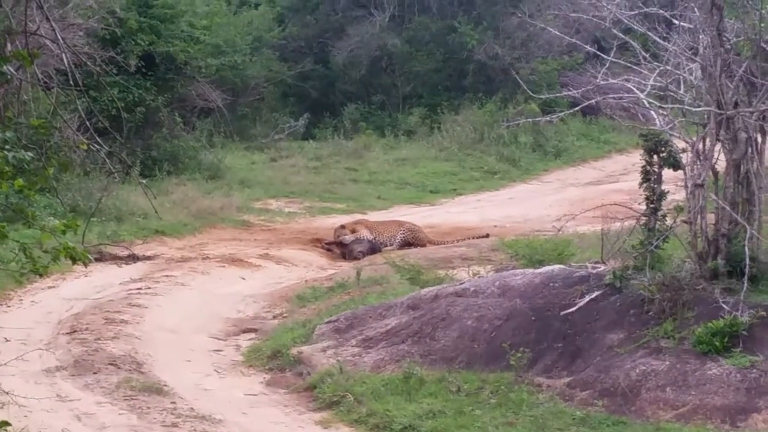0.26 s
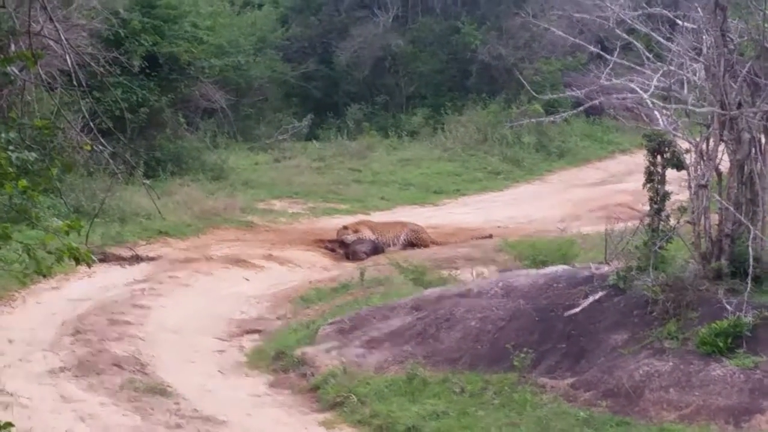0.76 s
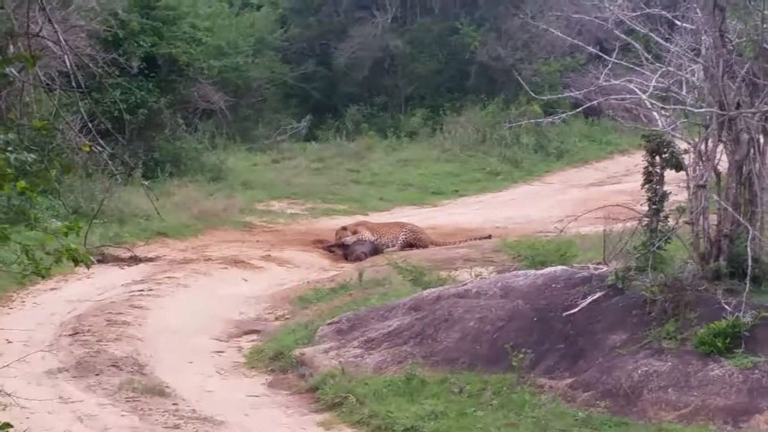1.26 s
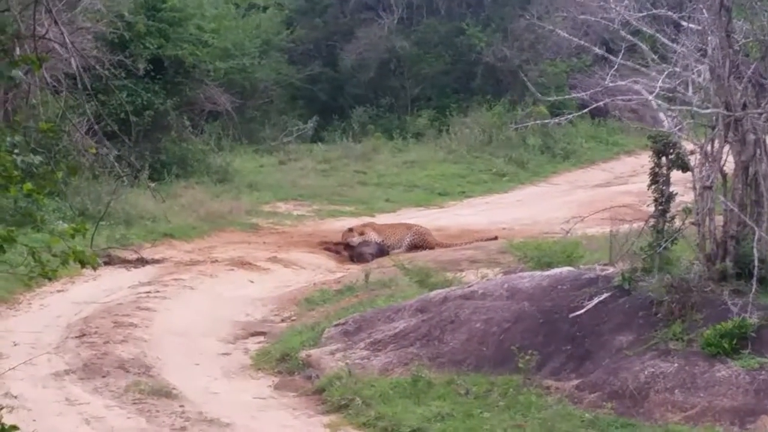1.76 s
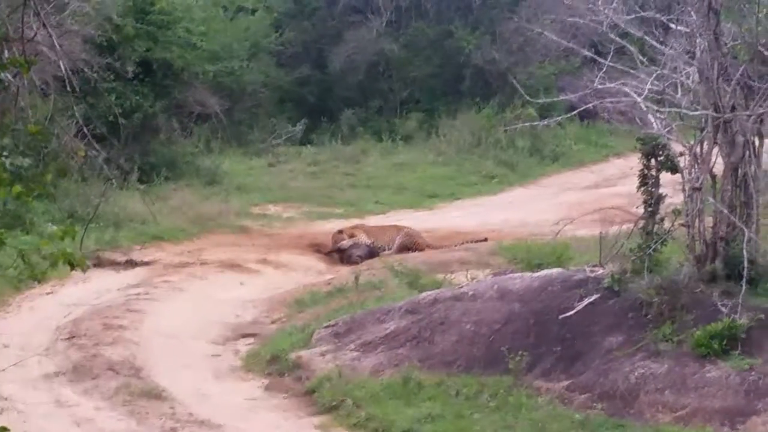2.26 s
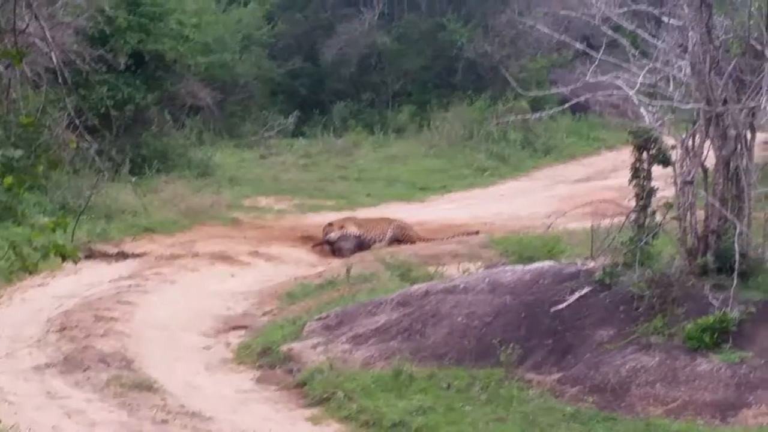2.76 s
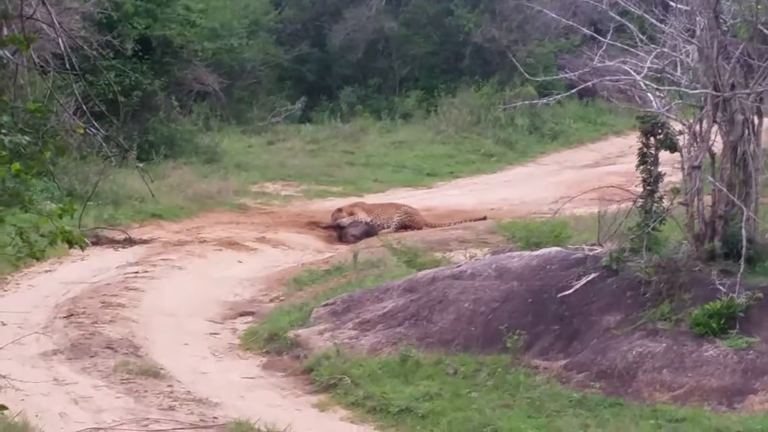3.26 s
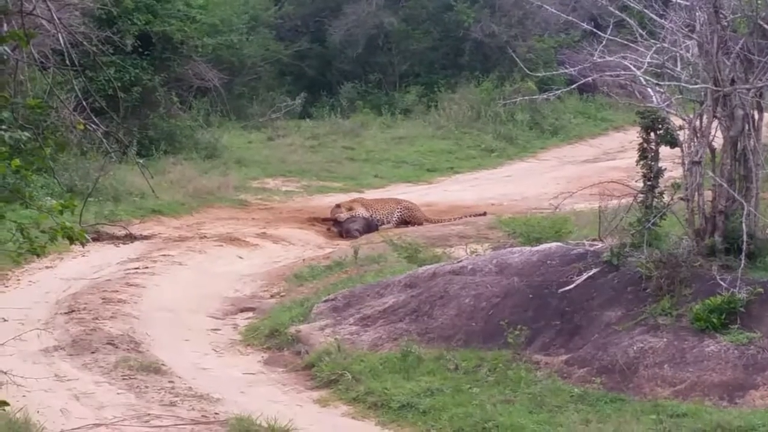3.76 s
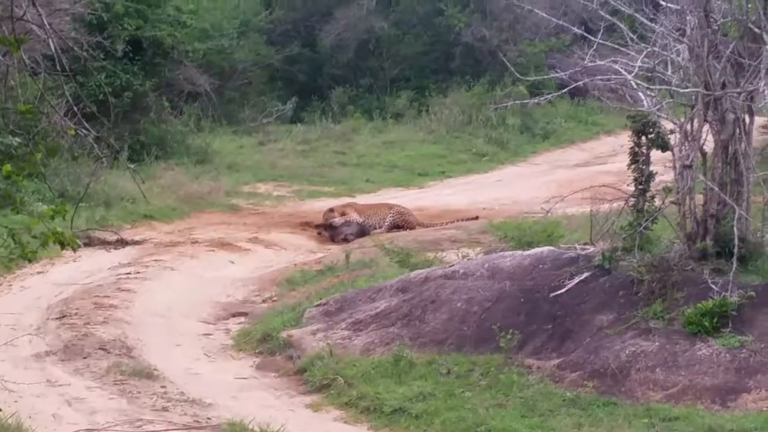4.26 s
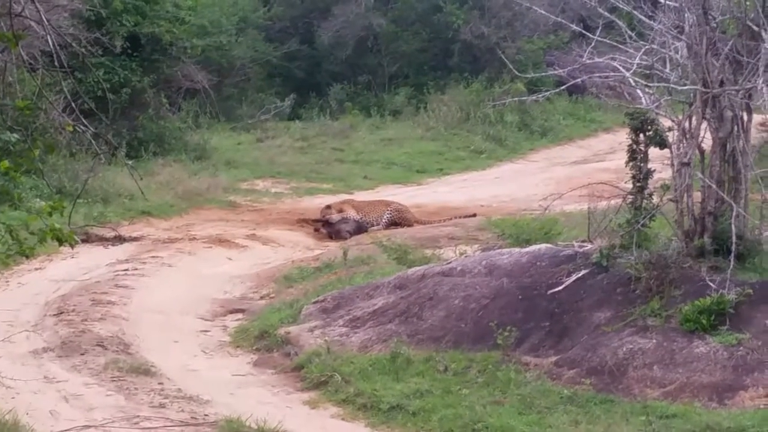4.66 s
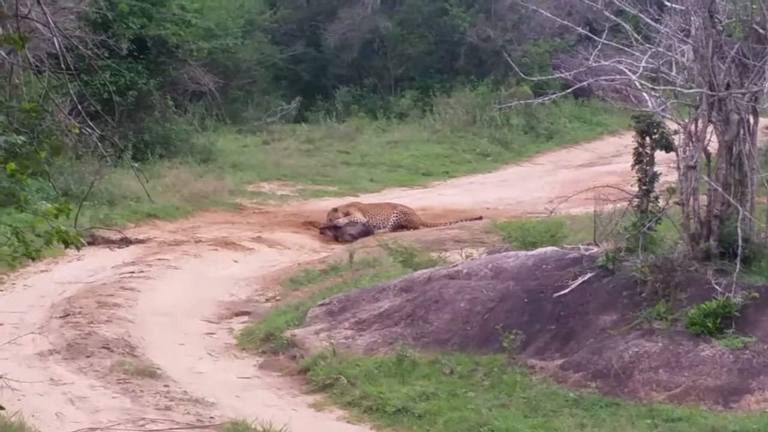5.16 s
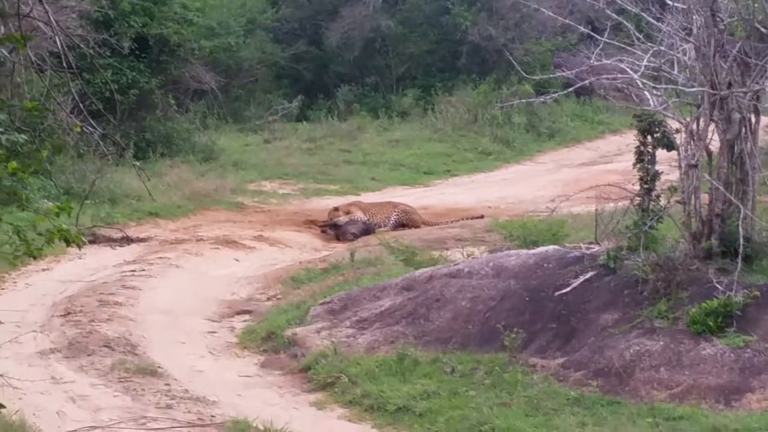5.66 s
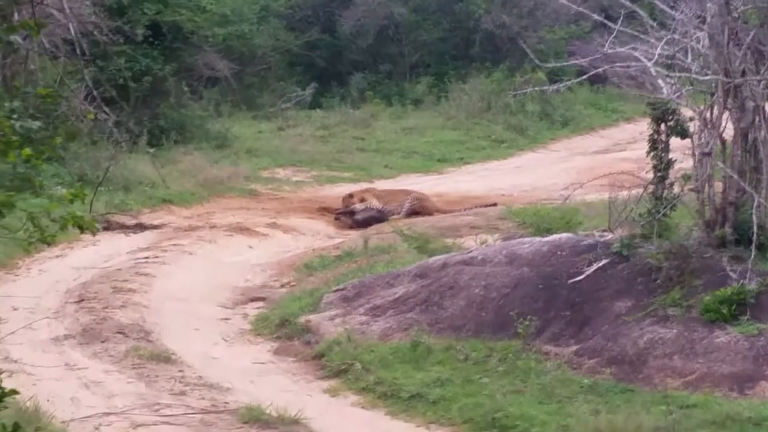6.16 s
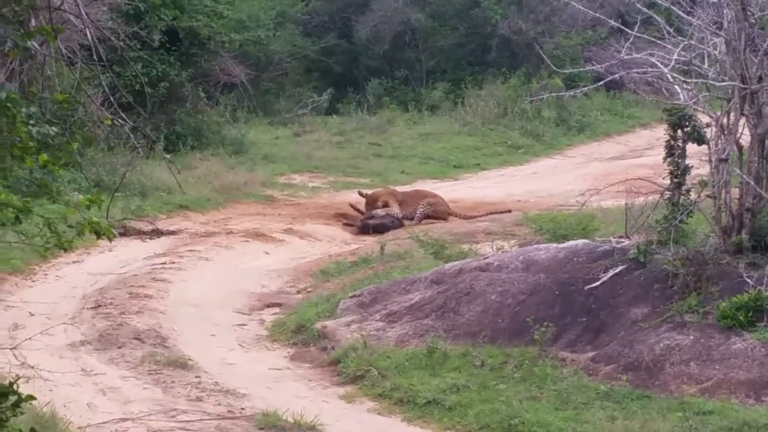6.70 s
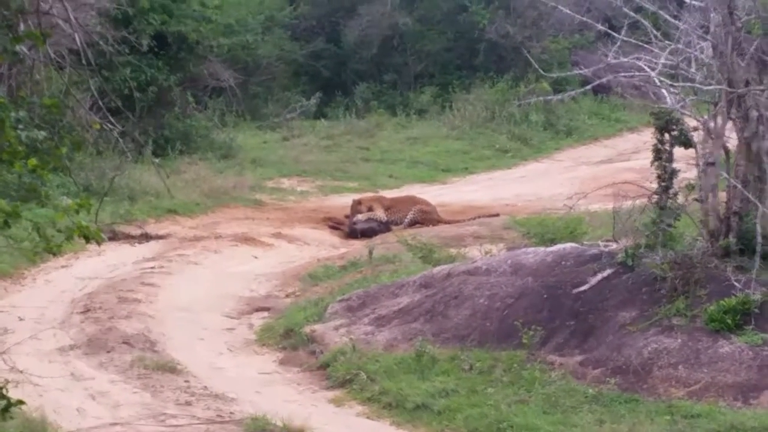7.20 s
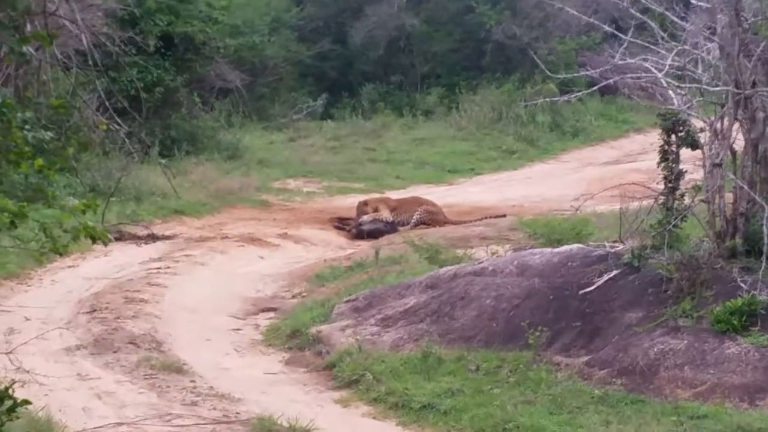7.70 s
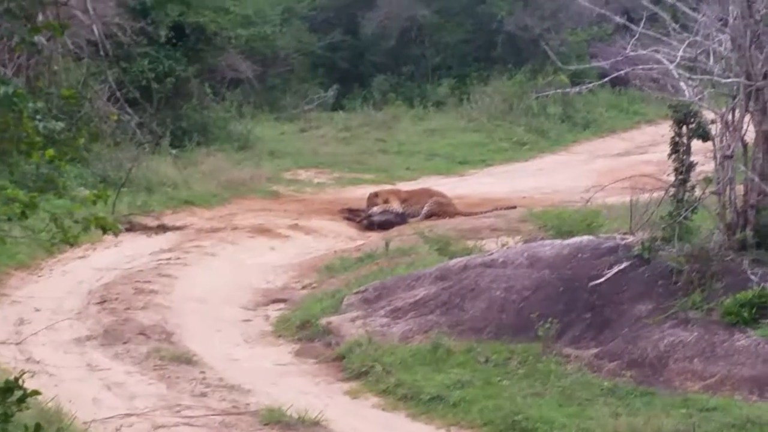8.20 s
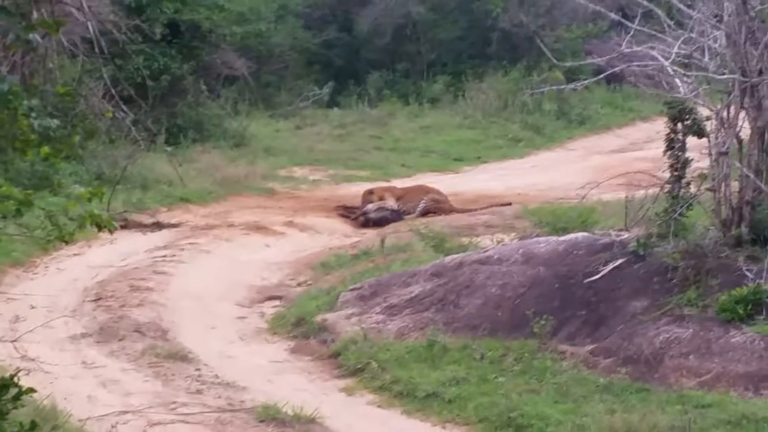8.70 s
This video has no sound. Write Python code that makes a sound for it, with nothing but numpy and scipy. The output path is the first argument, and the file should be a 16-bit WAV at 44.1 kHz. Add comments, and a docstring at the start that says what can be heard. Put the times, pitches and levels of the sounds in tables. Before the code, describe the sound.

Open bushland with a shimmering high insect chorus, smooth drone and low gusty rumble on the microphone. A cricket deep in the bush trills around four to five seconds. Then a boar some distance away groans and grunts weakly, barks, rasps upward and lets out a single harsh, fluttering squeal just over a second long, ending in hoarse gasps. A nearer cricket chirps sharply over the end.

```python
"""Boar squeal in the bush

A wild boar, pinned by a leopard on a dirt track some way off, grunts, rasps and breaks into one long squeal.
Its folds sing near 480 Hz while a slower flap in the throat chops the tone about 95 times a second;
hoarse calls are uneven clicks and noise through mouth filters. Crickets chirp in falling sweeps, near and far.
Filtered noise makes the rumble, wash, hiss, drone, twig ticks and scuffling; diffuse tails answer from the bush."""
import sys
import numpy as np
from scipy import signal
from scipy.fft import rfft, irfft
from scipy.io import wavfile
from scipy.ndimage import uniform_filter1d

SR = 44100
rng = np.random.default_rng(int(sys.argv[2]) if len(sys.argv) > 2 else 0)


def int16_out(signal):
    """Quantize to a 16-bit WAV file."""
    q = np.round(np.clip(np.atleast_2d(signal).T, -1, 1) * 32767)
    wavfile.write(sys.argv[1], SR, q.astype(np.int16))


N = 394254
TIME = np.arange(N) / SR  # s
FREQ = np.maximum(np.arange(N // 2 + 1) * SR / N, 1)  # Hz

# gusty rumble of the breeze: [t/s, level/dB]
BREEZE = [(0, -61), (1.6, -62), (2.4, -58), (3.5, -60), (5.7, -60), (8.1, -55), (8.94, -55)]
# colour of that rumble: [f/Hz, level/dB]
RUMBLE = [(16, -33), (28, -0.5), (65, 1.5), (139, -4.5), (237, -12.5), (400, -25), (520, -50), (880, -120)]
# air buffeting the microphone, the last two rows dull thumps of the struggle: [t/s, peak level/dB, f/Hz]
BUFFETS = [(0.278, -48, 79), (1.328, -49, 136), (2.204, -45, 72), (2.339, -44.5, 80.7), (2.769, -42.5, 53),
           (3.058, -41, 77.4), (3.9, -46, 177), (4.095, -36.5, 130), (6.06, -45, 100), (8.029, -34.5, 220)]
# colour of the forest's distant wash: [f/Hz, level/dB]
WASH = [(250, 3.5), (450, -3.5), (700, -9.5), (1000, -10.5), (1400, -17.5), (2200, -20), (3200, -27)]
# the wash over time: [t/s, level/dB]
WASH_LEVEL = [(0, -75.5), (3.3, -72), (5.3, -69.5), (8.94, -66.5)]
# colour of the thin top hiss: [f/Hz, level/dB]
HISS = [(8500, -15.5), (10000, -14.5), (11000, -3), (15500, 0.5)]
# the hiss over time, before an 8 dB lift: [t/s, level/dB]
HISS_LEVEL = [(0.0, -89), (1.04, -91), (1.87, -82.5), (4.01, -89.5), (4.56, -82.5), (6.6, -88.5),
              (6.8, -82), (8.22, -74.5), (8.66, -86.5), (8.94, -76)]
# faint, airy calls gliding far away: [start t/s, length/s, from f/Hz, to f/Hz, level/dB]
FAR_CALLS = [(1.331, 0.25, 461, 585, -71), (2.49, 0.65, 2750, 1865, -77.5), (3.433, 0.46, 464, 647, -71)]
# smooth insect drone, right side 9 dB lower: [t/s, left level/dB]
DRONE = [(0, -74), (3.5, -72), (4.7, -70), (8.94, -69.5)]
# high far chorus: [t/s, level/dB]
CHORUS = [(0, -55), (1, -57.5), (1.6, -55.5), (4.7, -54), (6.5, -55), (6.8, -52), (8.2, -49), (8.6, -53.5)]
# outline filter on the high far chorus, strongest from 6 to 8 kHz: [f/Hz, level/dB]
CHORUS_OUTLINE = [(5300, -20.5), (5750, -8), (6050, 0), (6900, -1.5), (7650, 5), (8050, -7), (8500, -22.5),
                  (15500, -15)]
# lower-pitched far crickets: [t/s, level/dB]
LOW_CHORUS = [(1.0, -90), (1.8, -76), (2.2, -65.5), (5.3, -67.5), (6.1, -85), (6.8, -81), (7.5, -60.5),
              (8.5, -64.5)]
# bout of a cricket deep in the bush:
# [start t/s, lone strokes, their spacing/s, first chirp t/s, chirps, chirp period/s, full level/dB]
BUSH_CRICKET = [(4.0575, 8, .0376, 4.382, 12, .0769, -35.5)]
# colour of the bush cricket's direct chirps, two-peaked near 4.6 and 5.5 kHz: [f/Hz, level/dB]
BUSH_DIRECT_COLOUR = [(4000, -6), (4550, 9.5), (4820, 7), (5050, -3), (5300, -18), (5520, 8.5),
                      (5800, -3.5), (9700, -31), (10800, 11.5), (11600, -4), (15500, 0)]
# colour of the bush cricket's diffuse echo: [f/Hz, level/dB]
BUSH_ECHO_COLOUR = [(4000, 1), (4750, -4), (5050, 0.5), (5450, 0), (5800, -13), (9700, -36), (10800, 7.5),
                    (11600, -5), (15500, 4)]
# bouts of the near cricket:
# [start t/s, lone strokes, their spacing/s, first chirp t/s, chirps, first chirp period/s, full level/dB]
NEAR_CRICKET = [(2.7785, 2, .056, 2.903, 1, .085, -38), (7.1817, 2, .054, 7.2986, 2, .091, -31),
                (7.8385, 1, .054, 7.8722, 5, .0794, -26), (8.689, 0, .054, 8.691, 4, 0.0737, -26)]
# colour of the near cricket: [f/Hz, level/dB]
NEAR_TONE = [(3500, -2.5), (6000, -0.5), (9200, -2), (10100, 2), (11500, 5), (17000, 1.5)]
# dry twigs ticking: [t/s, noise burst level before the resonance/dB]
TICKS = [(2.4857, -55), (5.284, -51.5), (5.871, -47)]
# bodies scuffling on the dirt: [t/s, level/dB]
SCUFFLE = [(4.2, -75), (5.2, -65), (6.3, -73), (6.6, -63), (7.6, -60), (8.3, -62), (8.7, -76)]
# faint huffs of the struggle: [t/s, time from peak to 1/e/s, centre f/Hz, level/dB]
HUFFS = [(0.155, 0.068, 744, -81), (3.728, 0.041, 780, -74), (4.635, 0.047, 650, -67.5)]
# mouth colour of each kind of hoarse call: [f/Hz, level/dB]
GROAN_MOUTH = [(150, -43), (250, -11), (335, -29), (400, -6.5), (590, -1), (665, -11.5), (770, 2),
               (860, -10.5), (1210, -13.5), (1700, -27.5), (2800, -49), (3640, -76), (6160, -120)]
GRUNT_MOUTH = [(88, -16), (150, -4), (235, -2), (290, 7.5), (388, -15.5), (492, -18), (580, -11),
               (696, -22), (1600, -46), (2080, -67), (3520, -120)]
BARK_MOUTH = [(130, -46), (220, -30), (301, -20), (381, 0), (469, -10), (542, 2.5), (651, -12.5),
              (845, 3.5), (951, -37), (1140, -0.5), (1410, -15), (1670, -1.5), (2310, -26.5), (2530, -42),
              (4200, -35), (5000, -43), (6500, -64), (11000, -120)]
RASP_MOUTH = [(160, -62), (280, -19.5), (328, -31), (440, -11.5), (550, -6.5), (667, -16), (780, -8),
              (958, -15.5), (1110, -15.5), (1330, -25), (1460, -28), (1670, -20), (2070, -22.5),
              (2450, -40), (3500, -43.5), (4380, -36.5), (5000, -44), (6500, -88), (11000, -120)]
GASP_MOUTH = [(59, -42), (100, -14.5), (147, 2), (259, -17), (415, -2), (601, -4.5), (664, -15),
              (787, -6.5), (1280, -25.5), (3000, -31), (3900, -24.5), (6600, -120)]
# hoarse calls: [start t/s, attack/s, hold/s, release/s, level/dB, slap rate f/Hz, share of noise
# (over 1 the clicks invert), treble dB per dB of effort, glide per s, mouth colour]
HOARSE_CALLS = [(5.43, 0.094, 0.12, 0.075, -51, 84.5, 0.75, -0.5, 0.1, GROAN_MOUTH),
                (5.777, 0.064, 0.13, 0.15, -49.5, 54.95, 1.23, -4, 0.038, GRUNT_MOUTH),
                (5.829, 0.035, 0.027, 0.06, -61, 70, 0.53, 5, 0, GROAN_MOUTH),
                (6.134, 0.053, 0.012, 0.046, -60, 55, 0.8, -0.3, 0.097, GRUNT_MOUTH),
                (6.554, 0.039, 0.052, 0.037, -47.5, 111, 0.56, 11, 0.77, GROAN_MOUTH),
                (6.584, 0.046, 0.08, 0.11, -36.5, 129.3, 0.74, -1.1, 0.27, BARK_MOUTH),
                (6.778, .175, .11, 0.054, -37, 169.7, 0.83, -0.5, .8, RASP_MOUTH),
                (8.202, 0.03, 0.074, 0.06, -45.5, 89.6, 1.4, 0, 0.0081, GASP_MOUTH),
                (8.307, 0.034, 0.14, 0.12, -52.5, 89, 0.84, 0, 0.018, GASP_MOUTH)]
# thin whine carrying the bark over into the squeal: [t/s, f/Hz, level/dB]
WHINE = [(6.72, 1575, -67), (6.77, 1590, -49), (6.81, 1644, -60), (6.87, 1637, -50), (6.95, 1734, -48.5),
         (7.0, 1512, -47.5), (7.1, 1481, -37), (7.2, 1457, -41.5)]
# lower wail that climbs into the squeal: [t/s, f/Hz, level/dB]
WAIL = [(6.88, 685.7, -61), (6.95, 747, -33), (7.0, 819, -32), (7.06, 934, -60)]
# push and mouth of the squeal: [t/s, effort level/dB, opening as upper resonances over the lowest/dB]
SQUEAL = [(7.05, -43.5, 4), (7.1, -40, 2.5), (7.16, -38, 2), (7.24, -42, 8), (7.504, -36.5, 5.5),
          (7.72, -36, 5.5), (7.86, -32.5, -1), (8.03, -27, -8), (8.126, -28, -8), (8.19, -33.5, -11),
          (8.225, -50, 4.5)]
# pitch of the squeal: [t/s, f/Hz]
PITCH = [(7.05, 520.5), (7.1, 493.3), (7.17, 488), (7.3, 475.4), (7.48, 484.6), (7.58, 504.4),
         (7.67, 480.2), (7.74, 492.7), (7.81, 475.2), (7.86, 484.8), (7.94, 461.8), (8.08, 459.2),
         (8.15, 472.4), (8.22, 486)]
# slow flap in the throat: [t/s, rate f/Hz, chop of the lowest resonance,
# chop of the second (over 1 splits the line), pitch swing share, unsteadiness]
FLAP = [(7.05, 78, 0.3, 0.33, 0.093, 1.773), (7.17, 84.7, 0.27, 0.95, 0.15, 1.57),
        (7.32, 93, 0.83, 0.5, 0.14, 1.27), (7.48, 96.76, 1, 0.96, 0.16, 1.04),
        (7.61, 93.16, 0.5, 0.64, 0.16, 1.47), (7.74, 96.54, 0.85, 0.86, 0.19, 1.03),
        (7.86, 96.7, 0.22, 2.3, 0.15, 0.74), (7.93, 95.8, 0.16, 2.2, 0.17, 1.12),
        (8.05, 94.5, 0.045, 1.8, 0.21, 1.32), (8.2, 96.7, 0.085, 1.8, 0.1, 3.1)]
# throat resonances, levels counting only inside a shared band: [f/Hz, width/Hz, level/dB]
THROAT = [(442, 200, 0), (988, 303, 0), (1577, 247, -5), (1904, 130, -7), (2264, 110, -15.5),
          (2574, 160, -21.5), (2903, 170, -19)]
# five throat bands, low to top: [level over the effort/dB, share of the opening]
THROAT_PARTS = [(0, 0.15), (-0.5, 0.9), (-4, 0.78), (-10, 0.94), (-23, -0.083)]
# ring near 2 kHz against the rest of the squeal: [t/s, level/dB]
RING = [(7.05, 2), (7.18, -4), (7.34, -7), (7.4, 1), (7.53, -7), (7.65, -1.5), (7.74, -2.5), (7.9, 4),
        (8.2, 1.5)]
# thin resonances high above the squeal: [f/Hz, width/Hz]
TOP_RESONANCES = [(3990, 220), (4400, 190), (4850, 300)]
# how strongly each of those three rings: [t/s, level/dB, level/dB, level/dB]
TOP_LEVELS = [(7.05, -63, -63, -66.5), (7.28, -64, -54.5, -59), (7.42, -64, -55, -66),
              (7.56, -61.5, -61, -66), (7.74, -57.5, -59, -61), (8.0, -63, -62.5, -61),
              (8.12, -71.5, -63, -78)]
# stereo lean of the cries: [f/Hz, left minus right level/dB]
LEAN = [(200, -4), (480, 1.5), (700, 4.5), (1000, 12), (1600, 4), (2800, 9.5), (4200, 5)]


def undb(db):
    """Decibels to gain."""
    return 10 ** (np.asarray(db) / 20)


def unit(x):
    """Scale to rms 1."""
    return x / np.sqrt(np.mean(x ** 2))


def curves(table):
    """The columns of a table, joined by straight lines in time."""
    s, *columns = np.transpose(table)
    return [np.interp(TIME, s, c) for c in columns]


def during(table, fade):
    """1 while the table lasts, with soft ends `fade` seconds long."""
    inside = np.minimum(TIME - table[0][0], table[-1][0] - TIME)
    return np.clip(inside / fade, 0, 1)


def shape(points):
    """A (Hz, dB) outline on every frequency, joined along log frequency."""
    hz, db = np.transpose(points)
    return np.interp(np.log(FREQ), np.log(hz), db)


def colour(x, points):
    """Filter by an outline that falls steeply beyond its ends."""
    low_skirt = 1 / (1 + (points[0][0] / FREQ) ** 8)
    high_skirt = 1 / (1 + (FREQ / points[-1][0]) ** 8)
    return irfft(rfft(x) * undb(shape(points)) * np.sqrt(low_skirt * high_skirt), N)


def resonate(x, modes):
    """Parallel (Hz, width, dB) resonances, each applied twice for deep valleys."""
    response = 0
    for hz, width, db in modes:
        response = response + undb(db) / (1 + 1j * (FREQ ** 2 - hz ** 2) / (FREQ * width)) ** 2
    return irfft(rfft(x) * response, N)


def walk(rate):
    """Smooth chance with spread near 1, drawing `rate` new values a second."""
    return 1.2 * np.interp(TIME * rate, np.arange(N // 8), rng.standard_normal(N // 8))


def cycles(hz):
    """Running phase of an oscillator, in radians."""
    return 2 * np.pi * np.cumsum(hz) / SR


def steady(x):
    """Even out slow changes of level."""
    return x / np.sqrt(uniform_filter1d(x ** 2, size=2800) + 1e-12)


def add(track, s, sound):
    """Mix a sound in, centred on a time."""
    i = int(s * SR) - len(sound) // 2
    a, b = max(i, 0), min(i + len(sound), N)
    if b > a:
        track[a:b] += sound[a - i:b - i]


def scatter(x, t60, wet_db, delay=0.01):
    """Direct sound plus a diffuse tail from leaves and trunks, different on each side."""
    t = TIME[:SR]
    tail = rng.standard_normal((2, SR)) * undb(-60 * t / t60) * (t > delay)
    tail /= np.sqrt(np.sum(tail ** 2, axis=1, keepdims=True))
    wet = signal.fftconvolve(np.atleast_2d(x), tail, axes=1)[:, :N]
    return (x + undb(wet_db) * wet) / np.hypot(1, undb(wet_db))


def ports(x, lag):
    """A sound from the side reaches the left port `lag` seconds after the right."""
    return np.array([np.roll(x, int(lag * SR)), x])


def air():
    """Gusty rumble with single soft buffets and thumps, the forest's wash, and a thin hiss on top."""
    eddies = colour(rng.standard_normal((2, N)), [(15, 7.0), (60, 5.5), (130, 5.5), (300, 4.0), (900, -9.0)])
    # shared gusts plus eddies that differ at each port
    wind = unit(colour(rng.standard_normal(N) + eddies, RUMBLE))
    wind *= undb(curves(BREEZE)[0] + 2.0 * walk(18))
    bumps, t = np.zeros(N), np.arange(-SR // 20, SR // 20) / SR
    for s, db, hz in BUFFETS:
        add(bumps, s, undb(db) * np.sin(2 * np.pi * hz * t) * np.exp(-(t * hz / 0.36) ** 2))
    wash_noise = rng.standard_normal(N) + 4.8 * rng.standard_normal((2, N))
    wash = unit(colour(wash_noise, WASH)) * undb(curves(WASH_LEVEL)[0] + walk(4.5))
    hiss = unit(colour(rng.standard_normal((2, N)), HISS)) * undb(curves(HISS_LEVEL)[0] + 8.0)
    return (wind + bumps + wash + hiss) * undb([[-1], [1]])  # the right side is lifted by 2 dB


def far_call(start, length, from_hz, to_hz, db):
    """A faint, airy call: a wavering sine slides in pitch and fades into a long diffuse tail."""
    part = np.clip((TIME - start) / length, 0, 1)
    hz = from_hz + (to_hz - from_hz) * part
    tone = np.sin(cycles(hz * (1 + 0.033 * walk(500))))
    envelope = np.minimum(part * 10, 1) * (1 - part)
    return scatter(tone * undb(db) * envelope, t60=0.59, wet_db=6)


def stroke(hz, fall, width, second_db=-21, third_db=-31, bite=0):
    """One wing stroke: the scraper slows along the file, so the tone falls; it is loudest midway."""
    t = np.arange(-SR // 50, SR // 50) / SR
    phase = cycles(hz * (1 - fall * np.tanh(t / (2 * width))))
    hard_middle = np.exp(-(t / 0.0038) ** 4)  # the scraper's bite; 3.8 ms from centre to 1/e
    swell = (np.exp(-np.abs(t / width)) + bite * hard_middle) / (1 + bite)
    tone = np.sin(phase) + undb(second_db) * np.sin(2 * phase)
    tone += undb(third_db) * np.sin(3 * phase) * (3 * hz < SR * .4)  # left out near the band limit
    return tone * swell * signal.windows.tukey(len(t))


def chorus(hz, fall, width, rate, gap, step_db, wet_db, spread, count):
    """Far crickets, each `step_db` above the last, chirp pairs of strokes at their own pitch and pace."""
    out = np.zeros((2, N))
    for k, (pace, start, side) in enumerate(rng.uniform(-1, 1, (count, 3))):
        song = np.zeros(N)
        sound = stroke(hz * (1 + spread * np.sin(2 * k)), fall, width, -63.5, -82.0)
        for n, (late, first_chance, second_chance) in enumerate(rng.standard_normal(size=(130, 3))):
            s = (n + start - 1) / (rate * (1 + .04 * pace)) + .003 * late
            add(song, s, undb(2 * first_chance) * sound)
            add(song, s + gap, undb(2 * second_chance) * sound)
        out += undb(k * step_db) * ports(song, side * .0004)
    return unit(scatter(out, t60=1.0, wet_db=wet_db))


def bout(row, pair_gap, slowing, swell_db, swell_s, first_db):
    """Stroke times and levels: lone strokes lead in, then paired chirps swell, each gap `slowing` s longer."""
    start, lone, spacing, first_chirp, chirps, period, full_db = row
    strokes = [(start + k * spacing, first_db) for k in range(round(lone))]
    for k in range(round(chirps)):
        s = first_chirp + k * period + slowing * k * (k - 1) / 2
        strokes += [(s, first_db), (s + pair_gap, 0)]
    return [(s, full_db + db - swell_db * np.exp((start - s) / swell_s)) for s, db in strokes]


def cricket(bouts, hz, fall, width, second_db, third_db, uneven_db, pitch_rise, bite):
    """A single cricket: strokes vary in level, and those planned louder sound a little higher."""
    strokes = sum(bouts, [])
    out, top_db = np.zeros(N), max(db for _, db in strokes)
    for (s, db), chance in zip(strokes, rng.standard_normal(len(strokes))):
        speed = undb(db - top_db) ** pitch_rise
        sound = stroke(hz * speed, fall, width, second_db, third_db, bite)
        add(out, s, undb(db + uneven_db * chance) * sound)
    return out


def insect_drone():
    """A smooth band of noise, stronger on the left, swelling a little."""
    band = [(2900, -15.5), (3350, 3), (3800, 2), (4400, -2.0), (5100, -10.5), (6000, -19.5)]
    drone = unit(colour(rng.standard_normal((2, N)), band))
    return drone * undb(curves(DRONE)[0] + np.array([[0], [-9]]) + 0.3 * walk(9.4))


def far_choruses():
    """Two far groups of crickets, high and low, blurred by long diffuse tails."""
    high = chorus(hz=6804, fall=0.17, width=0.0042, rate=11.6, gap=.024,
                  step_db=0.5, wet_db=-2.5, spread=0.055, count=7)
    low = chorus(hz=5380, fall=0.13, width=0.0033, rate=13.0, gap=0.029,
                 step_db=1, wet_db=-1, spread=0.035, count=4)
    high = unit(colour(high, CHORUS_OUTLINE)) * undb(curves(CHORUS)[0])
    return high + low * undb(curves(LOW_CHORUS)[0])


def bush_cricket():
    """Falling strokes heard as coloured direct chirps plus a dense diffuse echo with its own colour."""
    bouts = [bout(row, pair_gap=0.0195, slowing=0, swell_db=19.5, swell_s=0.13, first_db=-2.0)
             for row in BUSH_CRICKET]
    song = cricket(bouts, hz=5160, fall=0.15, width=0.0034, second_db=-27.5, third_db=-31,
                   uneven_db=0.9, pitch_rise=0.0428, bite=0)
    echoes = scatter(colour(song, BUSH_ECHO_COLOUR), t60=0.085, wet_db=27, delay=0.003)
    direct = undb(-1) * ports(colour(song, BUSH_DIRECT_COLOUR), 0.00036)
    return scatter(direct + echoes, t60=0.5, wet_db=-14)


def near_cricket():
    """Hard-edged falling strokes, with a short close scatter and then a longer, weaker tail."""
    bouts = [bout(row, pair_gap=.0205, slowing=0.0049, swell_db=11.0, swell_s=0.11, first_db=-1.5)
             for row in NEAR_CRICKET]
    song = cricket(bouts, hz=5290, fall=0.125, width=0.0032, second_db=-18.0, third_db=-24,
                   uneven_db=.7, pitch_rise=0.0342, bite=1.1)
    close = scatter(ports(song, -.00003), t60=0.055, wet_db=-4, delay=0.0035)
    return scatter(colour(close, NEAR_TONE), t60=0.27, wet_db=-10.0)


def insects():
    """A smooth drone, two far choruses, a cricket in the bush and one close by."""
    return insect_drone() + far_choruses() + bush_cricket() + near_cricket()


def twigs():
    """Short dry ticks: decaying noise bursts ring one broad resonance."""
    out, t = np.zeros(N), np.arange(-SR // 20, SR // 20) / SR
    for s, db in TICKS:
        add(out, s, undb(db) * rng.standard_normal(len(t)) * np.exp(-np.abs(t) / 0.0085) * (t > 0))
    return scatter(resonate(out, [(1640, 870, 0)]), t60=.3, wet_db=-3)


def scuffle():
    """Dull, uneven low noise as the two animals struggle on the ground."""
    thuds = unit(colour(rng.standard_normal(N), [(65, -10.5), (140, 2.0), (270, -5.5)]))
    return thuds * undb(curves(SCUFFLE)[0] + 5.0 * walk(22)) * during(SCUFFLE, 0.25)


def huffs():
    """Soft swells of breath noise, each through one broad resonance."""
    puff, out = rng.standard_normal(N), np.zeros(N)
    for s, length, hz, db in HUFFS:
        out += unit(resonate(puff, [(hz, hz, 0)])) * undb(db) * np.exp(-((TIME - s) / length) ** 2)
    return out


def whine(table, waver, flutter_db):
    """Air forced through the tight throat keeps one resonance sounding: a wavering, fluttering sine."""
    hz, level_db = curves(table)
    tone = np.sin(cycles(hz * (1 + waver * walk(350))))
    return tone * undb(level_db + flutter_db * walk(70)) * during(table, 0.02)


def hoarse(start, attack, hold, release, db, slap_hz, rough, brighten, glide, mouth):
    """Slack folds slap unevenly: clicks and pulsed turbulent air pass through the mouth."""
    times = start + np.cumsum([0, attack, hold, release])
    range_db = 21.5  # a call climbs this far, holds, and falls back
    effort = list(zip(times, [-range_db, 0, 0, -range_db]))
    effort_db = curves(effort)[0]
    slaps = ((1 + np.cos(cycles(slap_hz * np.exp(0.23 * walk(90))))) / 2) ** 4
    click_turns = cycles(slap_hz * np.exp(.3 * walk(200))) / (2 * np.pi)
    clicks = unit(np.diff(np.floor(click_turns), prepend=0))
    turbulence = unit((.9 + slaps) * rng.standard_normal(N))
    voice = colour((1 - rough) * clicks + rough * turbulence, mouth)
    # effort tilts the treble: positive `brighten` dulls weak effort, negative sharpens it
    dull = signal.sosfilt(signal.butter(1, 700, fs=SR, output="sos"), voice)
    voice = dull + (voice - dull) * undb(brighten * effort_db)
    # reading ever faster slides the whole voice up, by `glide` of its pitch a second
    from_middle = TIME - times[1] - hold / 2
    voice = np.interp(TIME + glide * from_middle ** 2 / 2, TIME, voice)
    return steady(voice) * undb(db + effort_db) * during(effort, 0.025)


def folds(phase, count=8, slope_db=-4.5):
    """The harmonics of the vocal folds, changing by `slope_db` an octave."""
    return sum(undb(slope_db * np.log2(k)) * np.cos(k * phase) for k in range(1, count + 1))


def squeal():
    """Two oscillators: the slow flap chops and bends the tone of the folds, so harmonics grow sidebands."""
    effort_db, mouth_db = curves(SQUEAL)
    flap_hz, low_chop, mid_chop, swing, unsteady = curves(FLAP)
    pitch_hz = curves(PITCH)[0]
    swing_lag = 2.75  # rad, pitch swing against the chop
    flap = cycles(flap_hz * (1 + .014 * unsteady * walk(90)))
    phase = cycles(pitch_hz * (1 + .004 * unsteady * walk(200)))
    bend = swing * pitch_hz / flap_hz * np.sin(flap + swing_lag)

    # less air is lost as noise when the mouth is open
    breath = unit(colour(rng.standard_normal(N), [(300, -6), (1500, 2.5), (5000, -5.0)]))
    breath *= unsteady * undb(0.5 - 0.26 * mouth_db)
    uneven = 1 + 0.044 * unsteady * walk(140)

    low_tone = folds(phase + 0.32 * low_chop * bend) * uneven
    low = (1 + low_chop * np.cos(flap)) * (low_tone + .45 * breath)
    mid_tone = folds(phase + 0.27 * bend / np.maximum(mid_chop, 1)) * uneven
    mid = (1 + mid_chop * np.cos(flap)) * mid_tone + .35 * breath
    # as the flap shuts the pitch leaps, never twice alike, ringing high resonances with many sidebands
    stray = cycles(3.5 * unsteady * walk(300))  # pitch straying by 3.5 Hz times the unsteadiness
    leap = bend * (1 + .1 * unsteady * walk(120)) + stray
    harsh_tone = folds(phase + leap, count=11) * uneven
    harsh = (1 + 0.45 * np.cos(flap + swing_lag)) * harsh_tone + .35 * breath

    bands = [resonate(low, THROAT[:1]), resonate(mid, THROAT[1:2]), resonate(harsh, THROAT[2:3]),
             resonate(harsh, THROAT[3:5]), resonate(harsh, THROAT[5:])]
    lifts_db = 0, 0, 0, curves(RING)[0], 0
    cry = np.zeros(N)
    for band, lift_db, (db, share) in zip(bands, lifts_db, THROAT_PARTS):
        cry += steady(band) * undb(effort_db + db + lift_db + share * mouth_db)
    # the top resonances flicker
    for (hz, width), db in zip(TOP_RESONANCES, curves(TOP_LEVELS)):
        cry += steady(resonate(harsh, [(hz, width, 0)])) * undb(db + 2.5 * walk(30))
    return cry * during(SQUEAL, 0.011)


def boar():
    """All the calls, scattered across the clearing and leaning left over most of their range."""
    voice = huffs() + sum(hoarse(*call) for call in HOARSE_CALLS) + squeal()
    voice += whine(WHINE, waver=0.0134, flutter_db=2.9) + whine(WAIL, waver=0.025, flutter_db=2.4)
    heard = scatter(voice, t60=.62, wet_db=-12, delay=.012)
    sides = undb(np.outer([1, -1], shape(LEAN)) / 2)
    return irfft(rfft(heard) * sides / sides.mean(axis=0), N)


def scene():
    """The boar among the insects, in open air."""
    far_calls = sum(far_call(*call) for call in FAR_CALLS)
    return air() + far_calls + insects() + twigs() + scuffle() + boar()


def record(dry):
    """A steep low-pass takes off everything above about 15.85 kHz."""
    return signal.sosfilt(signal.ellip(10, .2, 70, 15850, fs=SR, output="sos"), dry)


dry = scene()
out = record(dry)
int16_out(out)
```